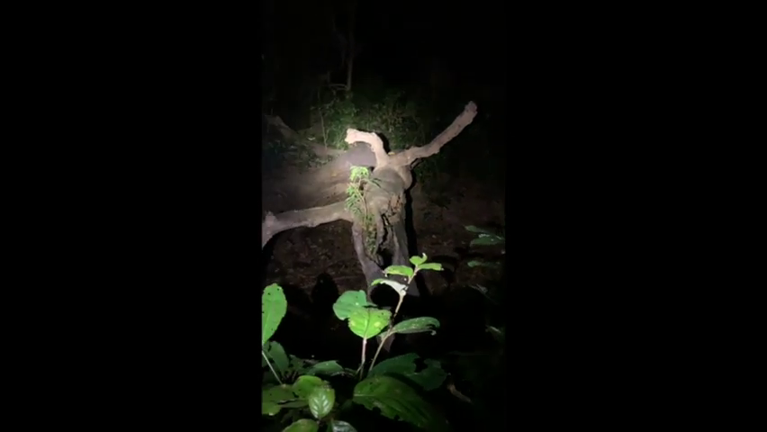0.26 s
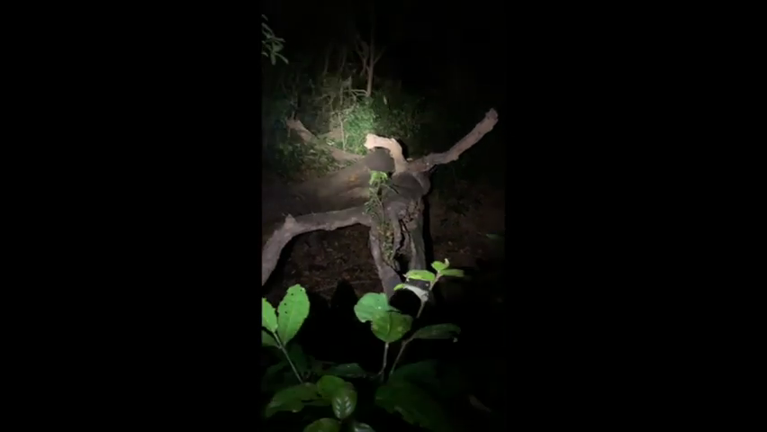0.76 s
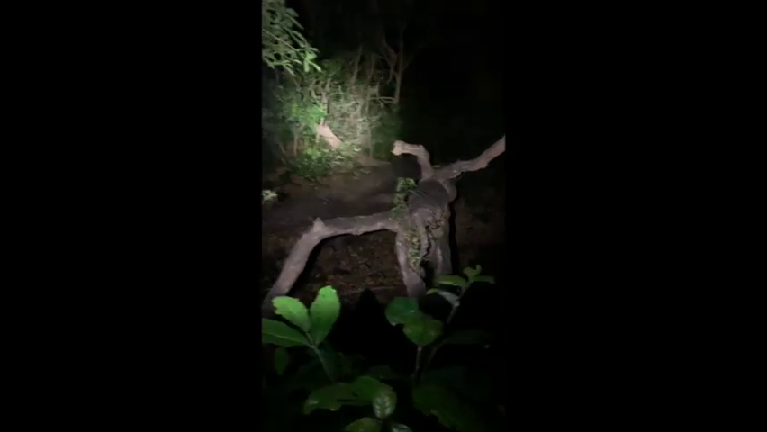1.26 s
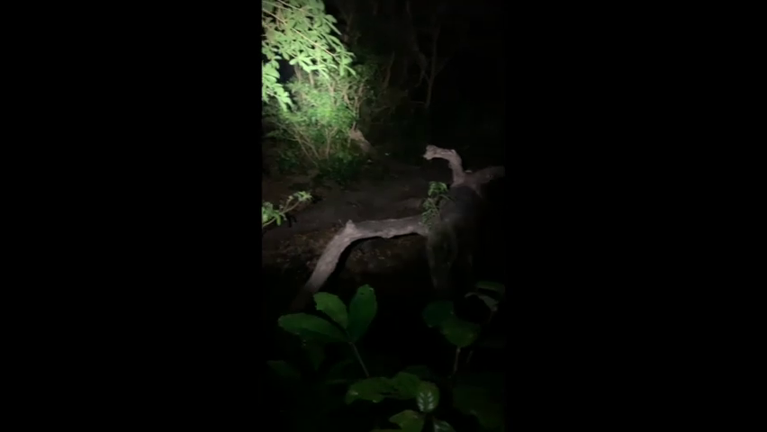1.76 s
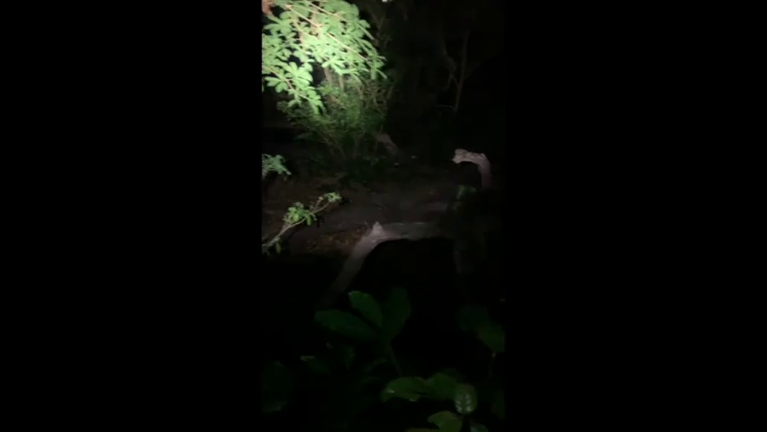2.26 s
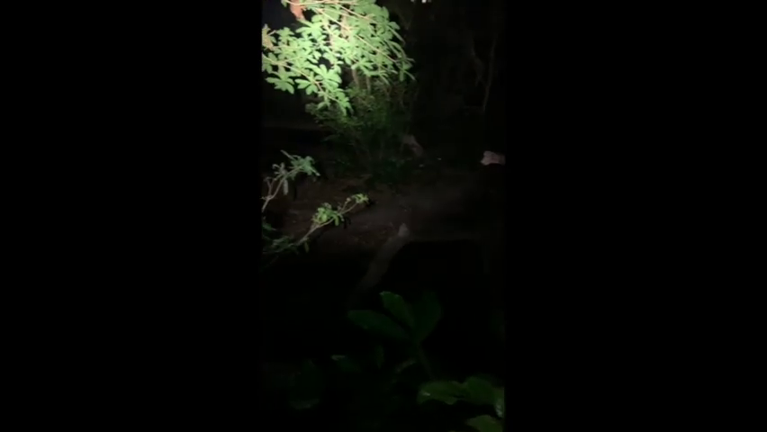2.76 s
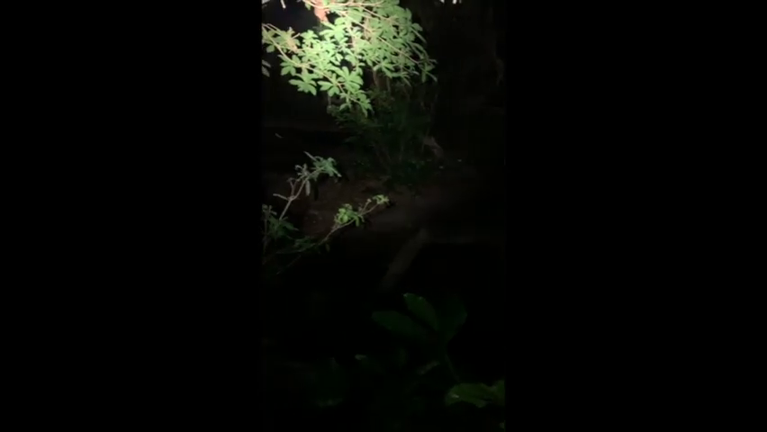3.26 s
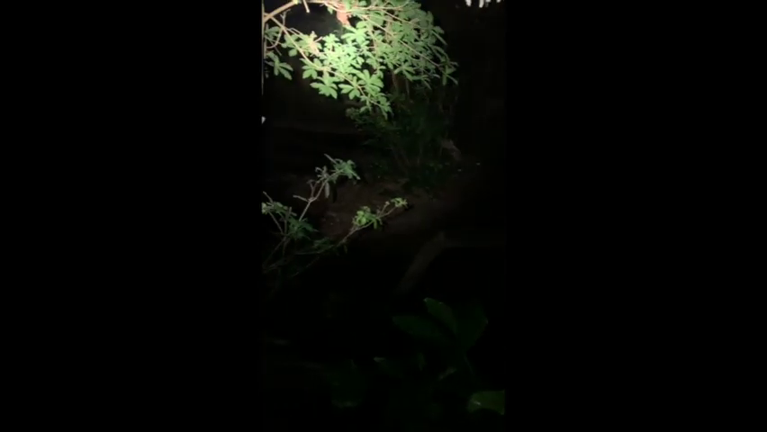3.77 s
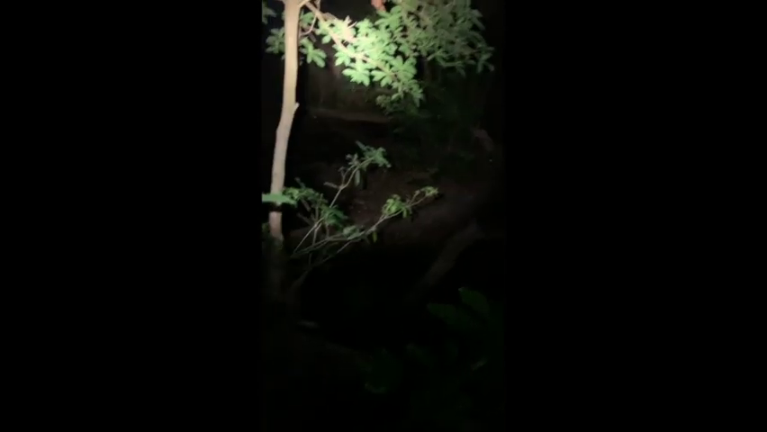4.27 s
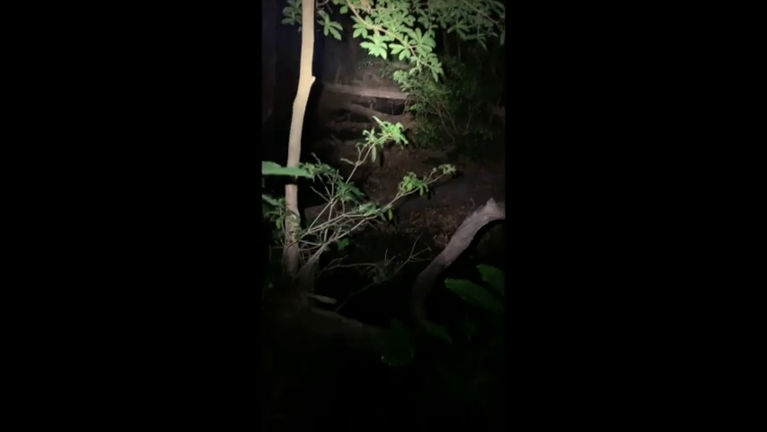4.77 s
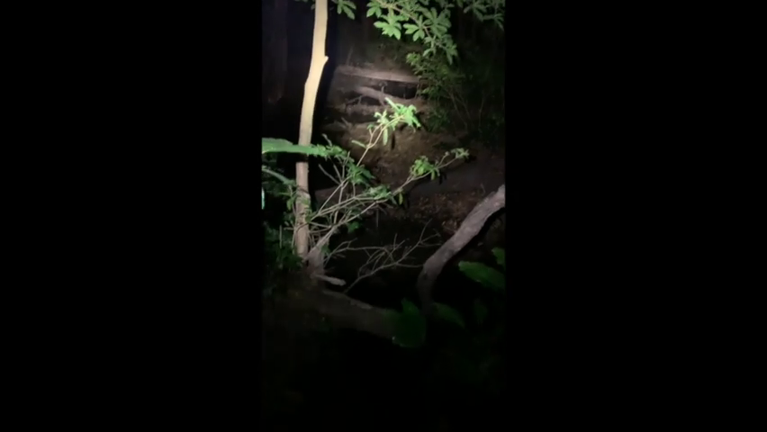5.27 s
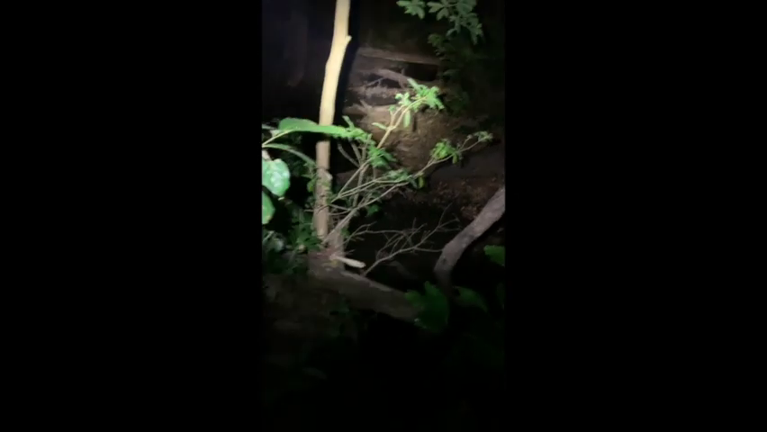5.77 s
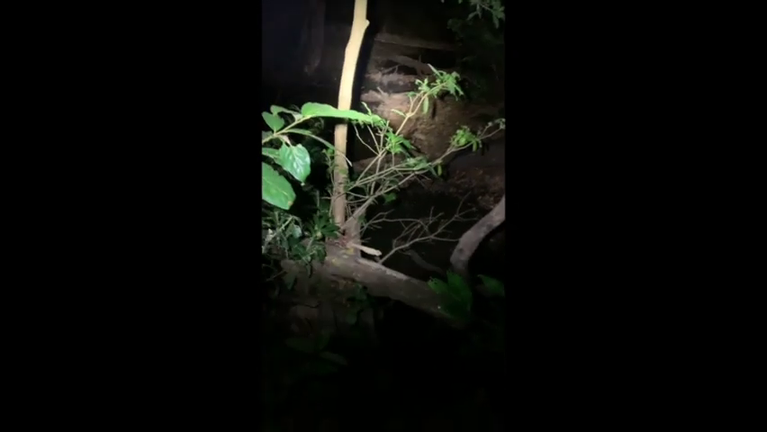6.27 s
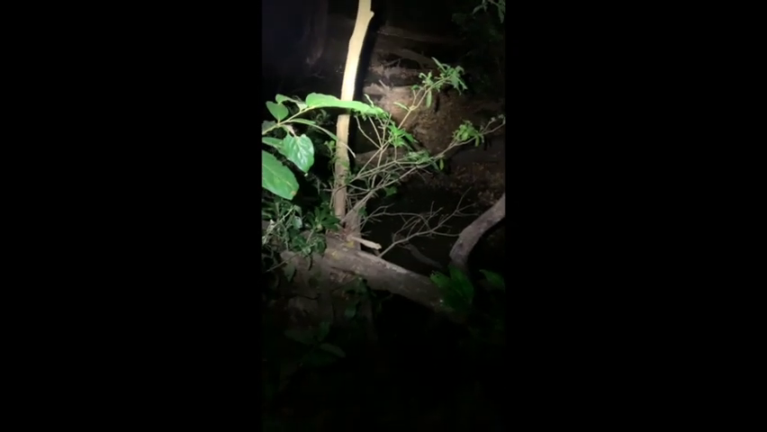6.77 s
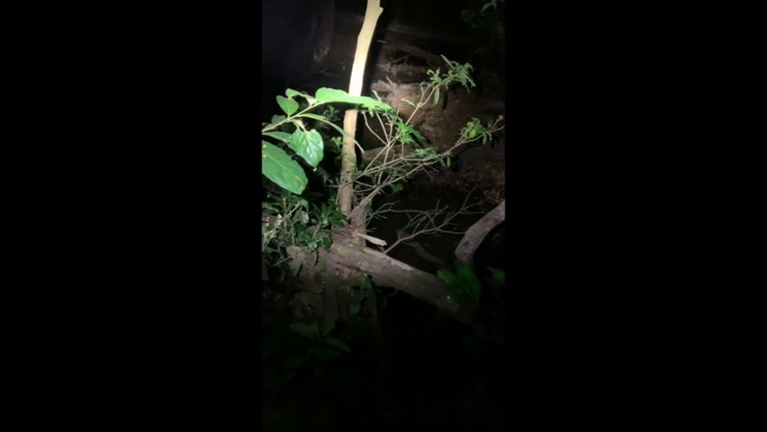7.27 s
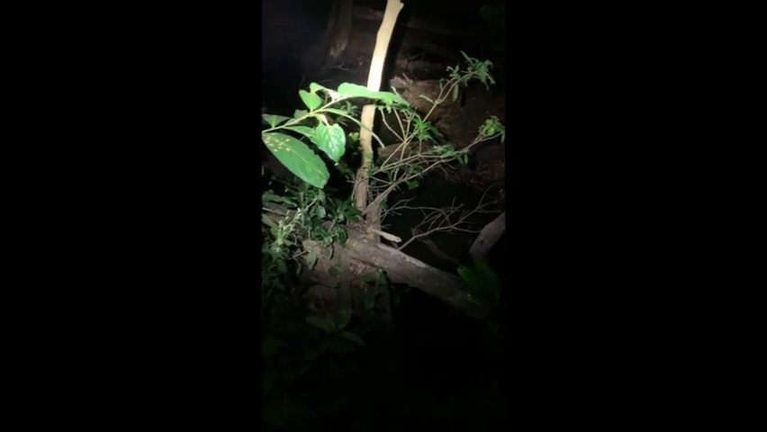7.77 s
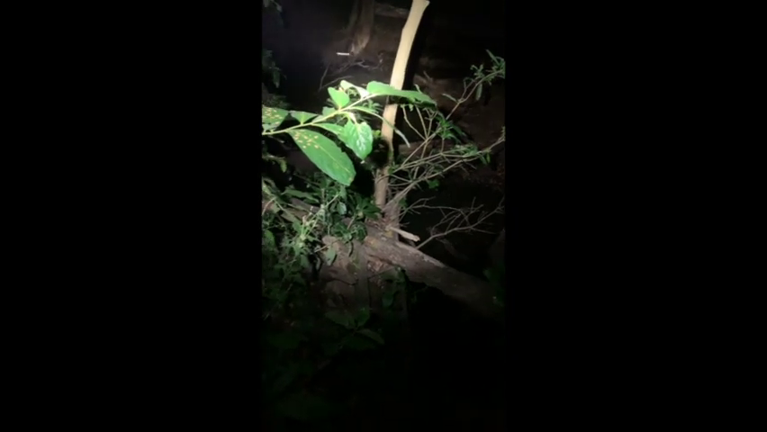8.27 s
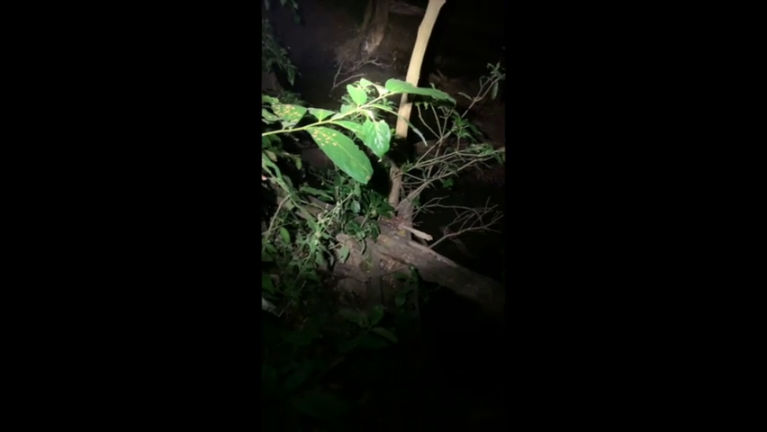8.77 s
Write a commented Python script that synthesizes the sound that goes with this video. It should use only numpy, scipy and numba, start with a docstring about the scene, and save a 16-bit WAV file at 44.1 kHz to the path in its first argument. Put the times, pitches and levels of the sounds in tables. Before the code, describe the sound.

Throughout, a dense, bright drone of crickets and katydids wavers over a soft forest hush: fluttering trills, quick high scratches several times a second and airy hissing surges. From 0.8 to 2.9 s a distant frog gives five notes, a thin opener and then throaty creaking clucks every half second, blurred by the trees. Dry twig ticks fall at about 0.6, 1.5, 2.7, 3.0 and 4.1 s; a very faint frog mutters near 3.4 s. At 4.6 s a near frog opens softly, then calls loudly at 4.85, 5.3, 5.8 and 6.2 s, each a rough knocking creak tightening into a nasal buzz. Soft low finger bumps come between 5.3 and 6.1 s. At 6.6 s a second near frog takes over, with faster notes at 6.9, 7.3, 7.7 and 8.1 s and hollow pops between. A faint mutter and the insects remain until an abrupt stop at 8.9 s.

```python
"""Crickets and katydids drone over a forest hush: wavering tones gated by wing strokes, and banded noise.
Then frogs call in bouts, a far one, two near ones in turn, while a fourth mutters far off.
Most notes start as a slow uneven creak and tighten into a rising buzz: fold pulses and puffs of air ring
throat and sac. Knocks, pops and thuds are short ringing tones. Trees echo the frogs in a noise tail.
Twigs snap as decaying noise, and fingers bump the phone that is held in a hand."""
import sys
import numpy as np
from scipy import signal
from scipy.fft import rfft, irfft
from scipy.io import wavfile
from scipy.ndimage import uniform_filter1d
from numba import njit

SR = 44100
rng = np.random.default_rng(int(sys.argv[2]) if len(sys.argv) > 2 else 0)


def transcribe(u):
    """Save the signal u as a 16-bit wav file named by the first command-line argument.

    u: samples, shape (n,) or (channels, n), limited to [-1, 1]; the rate is SR.
    q: integer samples, one column per channel.
    """
    v = np.clip(np.atleast_2d(u).T, -1, 1)
    q = np.round(v * 32767).astype(np.int16)
    wavfile.write(sys.argv[1], SR, q)


N = 396900
PORT_LAG_MS = 0.12


def undb(db):
    """Decibels to amplitude ratio."""
    return 10 ** (np.asarray(db) / 20)


def unit(x):
    """Scale to an RMS of 1."""
    return x / np.sqrt(np.mean(x ** 2))


def curve(s, values):
    """Straight lines through values at times in seconds."""
    return np.interp(np.arange(N) / SR, s, values)


def walk(rate):
    """Random levels held 1 / rate s and slewed; spread near 1.6."""
    k = int(SR / rate)
    held = np.repeat(rng.standard_normal(N // k + 1), k)
    return 2.0 * uniform_filter1d(held, k)[:N]


def ring(x, hz, width):
    """A resonance passed twice, for steep skirts."""
    b, a = signal.iirpeak(hz, hz / width, fs=SR)
    return signal.lfilter(b, a, signal.lfilter(b, a, x))


def place(x, pan_db, lag_ms):
    """Two microphone ports: pan_db is left minus right, the right one is reached lag_ms later."""
    turn = np.exp(-2j * np.pi * np.fft.rfftfreq(N, 1 / SR) * lag_ms / 1000)
    left = x * undb(pan_db / 2)
    right = irfft(rfft(x) * turn, N) * undb(-pan_db / 2)
    return np.array([left, right])


@njit
def pulse(hz, rough, wait, size):
    """A pulse at each wrap of the phase; roughness scatters the length and size of every cycle."""
    out, phase = np.zeros(len(hz) + 1), np.empty(len(hz))
    p, k, slow = 0., 0, 1.
    for i in range(len(hz)):
        step = hz[i] / slow / SR
        p += step
        if p >= 1:
            p, k = p - 1, k + 1
            g = np.exp(rough[i] * size[k])
            # split over two samples: the wrap falls between them
            out[i] += g * p / step
            out[i + 1] += g * (1 - p / step)
            slow = np.exp(rough[i] ** 1.5 * wait[k])
        phase[i] = p
    return out[:-1], phase


def blips(rows, rise_s, sag):
    """Short tones that swell, sag in pitch to Hz and die: rows (s, peak dB, Hz, seconds to fall 60 dB)."""
    out, t = np.zeros(N), np.arange(SR // 8) / SR
    for s, db, hz, t60 in rows:
        i = int(s * SR)
        swell = np.minimum(t / rise_s, 1) * undb(-60 * np.maximum(t - rise_s, 0) / t60)
        bent_t = t + sag * rise_s * (1 - np.exp(-t / rise_s))
        out[i:i + len(t)] += undb(db) * swell * np.sin(2 * np.pi * hz * bent_t)
    return out


# Forest hush. Each row: frequency in Hz, level in dB per Hz, likeness of the two ports 0-1.
HUSH_SPECTRUM = [(25, -100, .95), (54, -85, 0.98), (133, -89, 0.54), (300, -85, 0), (764, -89, 0),
                 (1380, -86, 0.03), (2420, -91, 1), (3590, -86.5, 0.75), (5340, -78, 0.63),
                 (5680, -92.5, 0.3), (7820, -83, 1), (9200, -102, 0.6), (15100, -100, .95)]


def hush():
    """Octave bands of noise, each flickering on its own, the bass most."""
    out, f = 0, np.fft.rfftfreq(N, 1 / SR)
    hz, db, alike = np.transpose(HUSH_SPECTRUM)
    at = np.log(f + 1)
    alike = np.clip(np.interp(at, np.log(hz), alike), 0, 1)
    tint = undb(np.interp(at, np.log(hz), db)) * np.sqrt(SR / 2)
    common, left, right = rfft(rng.standard_normal((3, N))) * tint
    common = rfft(place(irfft(common, N), 0, PORT_LAG_MS))
    both = np.sqrt(alike) * common + np.sqrt(1 - alike) * np.array([left, right])
    calm_db = curve([6.3, 7., 8.4, 8.8], [4.0, -2.0, -1.0, 0])  # the low rumble eases from 6.3 s
    for k in np.arange(4, 14.5):  # band centre 2 ** k Hz
        share = np.clip(1 - abs(at / np.log(2) - k), 0, 1)
        flicker_db = 3 if k < 8 else 1.7
        level_db = flicker_db * walk(14) + (k < 8) * calm_db
        out = out + undb(level_db) * irfft(both * share, N)
    return out


def phrases(rows, dip_db):
    """A level that swells to each phrase (middle s, length s, dB) over a constant floor."""
    t = np.arange(N) / SR
    coarse = t[::50]
    bumps = sum(undb(db) * np.exp(-(2 * (coarse - s) / length) ** 2) for s, length, db in rows)
    floor_db = np.mean(rows, axis=0)[2] + dip_db
    return np.interp(t, coarse, bumps) + undb(floor_db)


# Short swells of narrow noise. Each row: middle in seconds, length in seconds, level in dB.
NOISE_SWELLS = [(.97, .09, -47), (1.58, .08, -51), (2.72, 0.072, -57), (3.29, .2, -55), (6.18, 0.14, -54),
                (8.55, 0.22, -49.5)]


def noise_swells():
    """Short swells of narrow noise near 9.5 kHz."""
    band = unit(ring(rng.standard_normal(N), 9450, 600))
    return place(phrases(NOISE_SWELLS, -51) * band, 0, PORT_LAG_MS)


def insect(hz, width, stroke_hz, blur, lag_ms, spread, apart_hz):
    """Three near singers take turns, each wing stroke a burst of one wavering tone; far ones blur into noise."""
    tones = 0
    for offset in (-1, 0, 1):
        chance = rng.standard_normal((N // 50, 2)).T
        phase = pulse(stroke_hz * (1 + .01 * walk(2)), np.full(N, .03), *chance)[1]
        tone_hz = hz + apart_hz * offset + .015 * width * walk(4)
        tone = np.sin(2 * np.pi * np.cumsum(tone_hz) / SR)
        tones = tones + undb(15.4 * walk(3.8)) * tone * np.sin(np.pi * phase) ** 2
    scrape = (4.1 + np.exp(-phase / .5)) * rng.standard_normal(N)
    band = lambda x: unit(ring(ring(x, hz, width), hz, 0.79 * width))
    level = np.sqrt(uniform_filter1d(tones ** 2, size=6000))
    near = unit(tones / level + blur * band(scrape))
    return place(near, 0, lag_ms) + spread * band(rng.standard_normal((2, N)))


# Phrases of the low cricket choir. Each row: middle in seconds, length in seconds, level in dB.
LOW_CHOIR_PHRASES = [(.12, 0.29, -46.5), (.62, 0.33, -43.5), (.98, 0.38, -40), (1.53, 0.36, -38),
                     (2.3, 0.26, -41.5), (2.9, 0.69, -43), (3.38, 0.49, -42), (3.8, 0.17, -46),
                     (4.28, 0.42, -39.5), (4.95, 0.36, -49), (5.82, 0.46, -46), (6.5, 0.69, -44),
                     (7.15, 0.33, -44), (7.65, 0.34, -39.5), (8.5, 0.74, -39.5)]


def low_choir():
    """Low crickets: stroke-gated tones and blurred noise swell in phrases."""
    return phrases(LOW_CHOIR_PHRASES, -5.0) * insect(4666, 540, 128, 0.34, 0.083, 0.32, 75)


HIGH_CHOIR_DB, HIGH_WAVER_DB = -42.5, 1.5


def high_choir():
    """Higher crickets: stroke-gated tones and noise whose level drifts at random."""
    level = undb(HIGH_CHOIR_DB + HIGH_WAVER_DB * walk(4))
    return level * insect(5481, 430.5, 65, 0.63, 0.11, 0.35, 90)


# Katydid phrases. Each row: middle in seconds, level in dB.
KATYDID_PHRASES = [(0.022, -50.5), (0.266, -44.5), (0.519, -47.5), (0.843, -45.5), (1.12, -48.5),
                   (1.355, -47), (1.691, -44), (2.008, -43.5), (2.31, -48), (2.591, -47.5), (2.848, -42.5),
                   (3.18, -44), (3.468, -45), (3.712, -44), (4.057, -46.5), (4.284, -47), (4.549, -48),
                   (4.815, -46.5), (5.106, -48.5), (5.367, -46), (5.65, -44), (5.926, -47.5),
                   (6.231, -46.5), (6.495, -50), (6.786, -55), (7.051, -47), (7.304, -46.5), (7.579, -46.5),
                   (7.854, -44.5), (8.177, -44.5), (8.464, -46.5), (8.738, -49)]


def chirping_katydids():
    """Katydids: short phrases, more scraping noise than tone."""
    rows = [(s, 0.1, db) for s, db in KATYDID_PHRASES]
    return phrases(rows, 0.3) * insect(8230, 1100, 125, 2.6, PORT_LAG_MS, 0.062, 240)


# Trills of the nearest crickets. Each row: start in seconds, length in seconds, level in dB, pitch in Hz.
NEAR_TRILLS = [(0.46, 0.2, -41, 4685), (.85, 0.33, -41, 4690), (1.38, 0.35, -43, 4790),
               (2.151, 0.33, -46, 4657), (3.28, .27, -45, 4730), (4.1, 0.43, -48, 4650),
               (5.749, 0.21, -43, 4751), (6.45, .35, -44, 4640), (7.55, 0.36, -48, 4680)]
NEAR_STROKE_HZ, NEAR_FADE_S, NEAR_DEPTH = 125.6, 0.021, 1.1


def near_crickets():
    """A steady tone beaten by the wing strokes, one pitch for each trill."""
    out, t = 0, np.arange(N) / SR
    stroke_hz = NEAR_STROKE_HZ + 2.9 * walk(6.1)
    strokes = 1 + NEAR_DEPTH * np.cos(2 * np.pi * np.cumsum(stroke_hz) / SR)
    waver = np.cumsum(9. * walk(11)) / SR
    for s, length, db, hz in NEAR_TRILLS:
        gate = np.interp(t - s, [0, NEAR_FADE_S, length - NEAR_FADE_S, length], [0, 1, 1, 0])
        out = out + undb(db) * gate * np.sin(2 * np.pi * (hz * t + waver))
    return place(out * strokes * undb(2.7 * walk(31)), 0, 0.089)


# Surges of a broad hissing insect. Each row: middle in seconds, length in seconds, level in dB.
HISS_SURGES = [(.45, 0.43, -46.5), (1.4, 1, -52), (2.75, 0.54, -40), (3.8, 0.49, -47.5), (5., 0.69, -45.5),
               (6.3, 0.6, -43), (7.2, 0.75, -52.5), (8.45, 0.64, -39)]
HISS_HZ, HISS_WIDTH_HZ, HISS_LAG_MS = 12250, 3500, .121


def hiss():
    """Broad resonant noise in surges."""
    band = ring(rng.standard_normal(N), HISS_HZ, HISS_WIDTH_HZ)
    band = unit(ring(band, HISS_HZ, HISS_WIDTH_HZ))
    return place(phrases(HISS_SURGES, -8.5) * undb(1.5 * walk(15)) * band, 0, HISS_LAG_MS)


RASP_RISE_S, RASP_HZ, RASP_CLIMB_HZ_PER_S, RASP_HALF_WIDTH_HZ = 0.022, 13550, 8000, 210


def rasps(peaks, db):
    """Strokes of a high katydid: narrow noise that bites fast, slides upward and dies."""
    t, starts = np.arange(N) / SR, np.append(-1, np.sort(peaks) - RASP_RISE_S)
    u = t - starts[np.searchsorted(starts, t) - 1]  # time since the latest stroke
    u = np.minimum(u, 8 * RASP_RISE_S)
    low_pass = signal.butter(2, RASP_HALF_WIDTH_HZ, fs=SR, output="sos")
    rasp = unit(signal.sosfilt(low_pass, rng.standard_normal(N)))
    swell = u / RASP_RISE_S * np.exp(1 - u / RASP_RISE_S)
    carrier = np.sin(2 * np.pi * np.cumsum(RASP_HZ + RASP_CLIMB_HZ_PER_S * u) / SR)
    return undb(db) * swell * rasp * carrier


# Strokes of the nearest high katydid. Each entry: time of the peak in seconds.
NEAR_RASP_PEAKS_S = [.05, .28, .5, .75, .99, 1.2, 1.31, 1.42, 1.57, 1.68, 1.92, 2.11, 2.34, 2.54, 2.67,
                     2.85, 3.02, 3.17, 3.45, 3.83, 3.89, 4.19, 4.41, 4.64, 4.9, 5.14, 5.35, 5.56, 5.7, 5.95,
                     6.22, 6.44, 6.65, 6.84, 7.01, 7.23, 7.44, 7.85, 8.27, 8.52, 8.68]
NEAR_RASP_DB, FAR_RASP_DB, RASP_BED_DB = -36.5, -43, -45.5
FAR_RASPS_PER_S = 12  # one over the median gap


def high_katydids():
    """One near singer, one farther off at its own uneven pace, and a noise bed of distant ones."""
    far_peaks_s = np.cumsum(np.exp(.4 * rng.standard_normal(size=150))) / FAR_RASPS_PER_S
    bed = unit(ring(ring(rng.standard_normal(N), 13850, 1300), 13800, 1200))
    bed = undb(RASP_BED_DB + 1.2 * walk(6)) * bed
    apart = undb(-61) * unit(ring(rng.standard_normal((2, N)), 13800, 1200))
    near = rasps(NEAR_RASP_PEAKS_S, NEAR_RASP_DB)
    far = rasps(far_peaks_s, FAR_RASP_DB + 3.4 * walk(8))
    return place(near + far + bed, 0, PORT_LAG_MS) + apart


def insects():
    """The insects, each in its own band, and swells of narrow noise."""
    choirs = low_choir() + high_choir() + chirping_katydids()
    return near_crickets() + choirs + hiss() + high_katydids() + noise_swells()


# Twigs snap, leaves rustle. Each row: start in seconds, noise level in dB before the resonance, centre in Hz.
SNAPS = [(0.65, -31.5, 5470), (1.543, -29, 4943), (2.693, -33, 4995), (2.969, -34, 2217),
         (3.021, -31, 1505), (3.047, -34, 1780), (3.305, -36, 880), (4.142, -40, 5000)]


def ticks():
    """Broad dry snaps: decaying noise with random splinters rings a wide resonance."""
    out, t = np.zeros(N), np.arange(SR // 12) / SR
    for s, db, hz in SNAPS:
        i = int(s * SR)
        level_db = db + 2 * rng.exponential(size=len(t)) - 60 * t / .1
        splinters = undb(level_db) * rng.standard_normal(len(t))
        out[i:i + len(t)] += ring(splinters, hz, 2.0 * hz)
    return place(out, 0, PORT_LAG_MS)


# Fingers on the phone. Each row: start in seconds, peak in dB, pitch in Hz.
FINGER_BUMPS = [(3.893, -46, 98), (5.301, -45, 56.36), (5.392, -41, 69.6), (5.508, -39, 107),
                (5.793, -36, 123.5), (6.052, -48, 69.54)]


def bumps():
    """Fingers on the phone: low tones that die in 80 ms, alike at both ports."""
    return blips([(s, db, hz, .08) for s, db, hz in FINGER_BUMPS], 0.0061, 0)


TREES_T60_S = 0.3


def trees(x):
    """Trunks and leaves scatter a call into a short noise tail, unlike at each port."""
    t = np.arange(int(.7 * SR)) / SR
    fade = undb(-60 * t / TREES_T60_S) * np.minimum(t / 0.0062, 1)
    tail = rng.standard_normal((2, len(t))) * fade
    return signal.fftconvolve(x, tail / np.sqrt(np.sum(tail[0] ** 2)), axes=1)[:, :N]


# Frog notes. Each row: start in seconds, length in seconds, level in dB, top resonance extra in dB,
# first pulses in Hz, time to buzz lock in seconds, buzz at lock in Hz, buzz at end in Hz.
NOTES = [(.8, 0.25, -55.5, 5, 430.8, 0.23, 530, 542.5), (1.192, 0.35, -46, -1.5, 151, .19, 435.7, 441.7),
         (1.682, 0.34, -46, 3.5, 118.5, 0.084, 400, 456),
         (2.172, 0.32, -44.5, 4.5, 99.7, 0.11, 383.3, 435.2),
         (2.662, 0.25, -44.5, 3, 119.8, 0.11, 396.8, 441),
         (4.556, 0.155, -39.5, -7.5, 388, 0.14, 515.3, 536),
         (4.85, 0.27, -26.5, -1, 130.9, 0.19, 359.6, 367.5),
         (5.289, 0.29, -30.5, 2.5, 100.1, 0.2, 359.3, 372.4),
         (5.779, 0.285, -31, 3, 109.8, 0.084, 340.5, 404.8),
         (6.236, 0.3, -33, -1, 90.23, 0.093, 300, 422.3), (6.638, 0.15, -40.5, 2, 409.3, 0.12, 524, 542.7),
         (6.935, .245, -29, -1, 124.8, .1, 349.4, 428), (7.329, 0.23, -28, -0.5, 109.4, 0.15, 364.8, 378.5),
         (7.719, 0.25, -28.5, -1, 109.2, 0.13, 341.1, 348.3),
         (8.107, 0.24, -28.5, -6.5, 100.5, .11, 336.3, 354.9), (3.347, 0.27, -53, -32, 300, .1, 300, 300),
         (8.439, 0.33, -52, 2, 300, 0.11, 300, 300)]
# Steps of pitch where the folds dwell on the way to the lock. Each row: time in seconds, pulse rate in Hz.
PITCH_STEPS = [(.88, 481), (.94, 512.6), (4.602, 472), (4.652, 497), (4.9, 187), (4.955, 193.8),
               (4.973, 275.4), (5.015, 277.2), (5.346, 110.4), (5.384, 166.3), (5.405, 271), (5.456, 275.3),
               (5.819, 190.5), (7.389, 136.1), (7.415, 180.7), (7.435, 281), (7.801, 133.1), (7.824, 260.7)]
CLOSE_S, CLOSE_SAG, CLOSE_ROUGH = .035, .3, .55  # sag is a share of the pitch


def note(t, row, count, voice, shape):
    """One note: the folds glide or step to a buzz, and slacken as every note but a bout's first shuts."""
    start, length, db, top_db, first_hz, lock_s, lock_hz, end_hz = row
    clean, tiring, bend, creak = voice
    u = t - start
    rise_hz = first_hz + (lock_hz - first_hz) * np.clip(u / lock_s, 0, 1) ** bend
    steps = [(s - start, f) for s, f in PITCH_STEPS if 0 < s - start < lock_s]
    if steps:
        rise_hz = np.interp(u, *np.transpose([(0, first_hz), *steps, (lock_s, lock_hz)]))
    buzz_hz = np.interp(u, [lock_s, length - CLOSE_S], [lock_hz, end_hz])
    hz = np.where(u < lock_s, rise_hz, buzz_hz)
    shut = (count > 0) * np.clip(1 + (u - length) / CLOSE_S, 0, 1)
    # the slower the folds beat, the rougher; every note of a bout tires them more
    slow_rough = creak * np.clip(1 - hz / lock_hz, 0, 1) ** 2
    rough = clean + tiring * count ** 2 + slow_rough + CLOSE_ROUGH * shut
    share, *levels = np.transpose(shape)
    top, mid, sac = (db + np.interp(u / length, share, c) for c in levels)
    gate = np.interp(u, [-.016, .012, length, length + 0.00097], [0, 1, 1, 0])
    gains = gate * undb(top + top_db), gate * undb(mid), gate * undb(sac)
    return np.array([hz * (1 - CLOSE_SAG * shut), rough, *gains])


def roof(x, hz):
    """Steep low-pass: a body passes little above hz."""
    return signal.sosfilt(signal.cheby2(8, 40, 1.15 * hz, fs=SR, output="sos"), x)


# Throat of each frog. Rows: top, middle and two sac resonances, each centre in Hz and width in Hz;
# the last row: left minus right in dB, lag of the right port in ms.
THROATS = [
    [(2186, 210), (1762, 1030), (726, 210), (1351, 340), (-0.5, 0.16)],
    [(2179, 240), (1775, 1180), (624, 180), (1199, 37), (-1.3, 0.14)],
    [(2328, 540), (1688.5, 630), (678, 166), (1120, 178), (-3.5, 0.1)],
    [(2035, 910), (1390, 620), (665, 160), (970, 760), (0, 0.29)],
]
# Folds of each frog. Each row: roughness of the first buzz 0-1, roughness gained per square of the notes sung,
# bend of the speed-up (1 straight, more = late), roughness added at the slowest creak.
VOICES = [(.045, .008, .6, .9), (.04, .007, 1.1, .55), (.045, .010, 1.6, .5), (.35, 0, 1., 0)]
# Swell of a note, one table per frog. Each row: share of the length, top, middle and sac resonances in dB.
NOTE_SHAPES = [
    [(0, 2, -3, 1.5), (.2, 6, -0.5, -3), (.45, -1, 0.5, -7), (.65, 1, -3, -8.5), (.85, 7, -9, -5),
     (1, -1, 4.5, 3.5)],
    [(0, 3, 4, -7), (.12, 4.5, -3, -15.5), (.35, 0, -5, -12.5), (.5, -0.5, -2.5, -15.5),
     (.67, -9, -1, -11.5), (.83, 3.5, 1, -16), (1, 0, 0, -6.5)],
    [(0, 7, 1.5, -5.5), (.25, 5, -11, -11.5), (.5, -2.5, -7.5, -9.5), (.75, -3, -4.5, -8), (1, 3, 0, -4)],
    [(0, 5.5, -15, -4.5), (1, -1, -5, -10)],
]
# Swell of the note that opens a near frog's bout, then the far frog's. Columns as in NOTE_SHAPES.
OPENER_SHAPE = [(0, -21, 1, -8), (.3, -5, 6, -14), (.6, 1.5, -0.5, -10.5), (1, -11.5, 14, -1)]
FAR_OPENER_SHAPE = [(0, -20, 4, 0), (.3, -6, 6, -6), (.6, 8, 6.4, -17), (1, -1, 11, -4)]
# Body cutoff of each frog. One entry per frog, in Hz.
ROOFS_HZ = [2300, 2440, 2780, 2600]
# Sharp edge of each fold pulse, heard above the roof. One entry per frog: dB relative to the top resonance.
EDGES_DB = [-30, -20, -17, -38]
EDGE_HZ, EDGE_WIDTH_HZ = 2590, 2500
TOP_SAG, SAG_FROM_HZ, SAG_OVER_HZ = 0.06, 145, 181  # top resonance sinks by this share as the folds speed up


def frog(notes, voice, shape, throat, opener, roof_hz, edge_db):
    """Fold pulses and puffs of air ring the throat and the sac."""
    t, controls = np.arange(N) / SR, np.zeros((5, N))
    controls[0] = notes[0][4]
    for k, row in enumerate(notes):
        i, j = int((row[0] - .02) * SR), int((row[0] + row[1] + .02) * SR)
        controls[:, i:j] = note(t[i:j], row, k, voice, opener if k == 0 else shape)
    hz, rough, top_gain, mid_gain, sac_gain = controls
    chance = rng.standard_normal((N // 50, 2)).T
    beats, phase = pulse(hz, rough, .8 * chance[0], 1.2 * np.clip(chance[1], -2, 1.3))
    air = .09 * rough * np.exp(-phase / .3) * rng.standard_normal(N)
    # soft folds and a small body pass little above the throat or below the sac
    body = signal.butter(3, [430, 2550], "band", fs=SR, output="sos")
    # the breath pressure flutters, so even clean partials break up
    breath = undb(1.86 * walk(45)) * signal.sosfilt(body, beats + air)
    top, mid, sac, over = (ring(breath, *mode) for mode in throat[:4])
    top_hz, top_width = throat[0]
    top = ring(top, top_hz, 0.75 * top_width)  # each pulse swells in the top resonance before it dies
    low_hz, sunk = top_hz * (1 - TOP_SAG), np.clip((hz - SAG_FROM_HZ) / SAG_OVER_HZ, 0, 1)
    low_top = ring(ring(breath, low_hz, top_width), low_hz, 2 * top_width)
    top = (1 - sunk) * top + sunk * low_top
    # the lungs set the loudness, however fast the folds beat
    even = lambda x: x / np.sqrt(uniform_filter1d(x ** 2, size=2200) + 1e-12)
    edge = undb(edge_db) * top_gain * even(ring(beats + air, EDGE_HZ, EDGE_WIDTH_HZ))
    call = top_gain * even(top) - mid_gain * even(mid) + sac_gain * even(sac - 0.67 * over)
    return roof(call, roof_hz) + edge


# Single hard knocks of the folds. Each row: start in seconds, throat level in dB,
# sac relative to throat in dB, top resonance relative to throat in dB.
FOLD_KNOCKS = [(.816, -40.5, -1, -20), (1.052, -34, -15, -10), (1.063, -27, -10, -12),
               (1.2002, -32, -10, -17), (1.6911, -25, -9, -7), (2.1695, -24.5, -6, -12),
               (2.6594, -28.5, -15, -11), (4.8092, -24, -7, -14), (4.8267, -16.5, -10.5, -19),
               (4.8459, -13, -6, -13), (4.8544, -22, -3, -4), (5.1113, -17, -6, -4),
               (5.2314, -21.5, -5, -13), (5.248, -15, -14, -16), (5.2706, -13, -12.5, -6),
               (5.2937, -17, -26, -18), (5.6906, -21, -9, -15), (5.7054, -16, -8.5, -8),
               (5.7314, -16.5, -6, -15), (5.7367, -12.5, -9, -0.5), (5.7628, -13.5, -13, -1.5),
               (6.179, -23.5, -4, -22), (6.1941, -17.5, -7.5, -15), (6.224, -16.5, -7.5, -4),
               (6.2472, -18.5, -6.5, -15), (6.8816, -27.5, -6, -7), (6.896, -17, -7, -18),
               (6.9194, -18, -9, 0.5), (6.929, -24, -14.5, -16.5), (6.9386, -23.5, -16.5, -5),
               (7.2706, -27, -8, -24), (7.283, -16.5, -5, -13.5), (7.3098, -14.5, -7, -4),
               (7.316, -16, -12, 0), (7.3202, -15.5, -21, 6), (7.5338, -21.5, -9.5, -5),
               (7.5536, -14.5, -14, -5), (7.6593, -23.5, -7, -14), (7.6708, -16, -4.5, -11),
               (7.7044, -15.5, -0.5, 3.5), (7.7114, -15, -14, 0.5), (7.7328, -20, -14, 2.5),
               (7.7488, -23.5, -2, -11), (7.7687, -26.5, -9, -8), (7.921, -16.5, -14, -16),
               (7.9503, -12.5, -10, -5.5), (8.0744, -19.5, -3.5, -12), (8.106, -17, -7, -13),
               (8.1467, -15.5, -9, -7)]
# Throat under a knock. Each row: pitch in Hz, level in dB, fade by 1/e in seconds.
KNOCK_MODES = [(1330, -4.5, 0.0017), (1705, 1.5, 0.0019), (1873, -2.5, 0.0021)]
KNOCK_SAC_HZ, KNOCK_SAC_S, KNOCK_RISE_S, KNOCK_TOP_S = 654, 0.0062, .0009, 0.006


def knocks(notes, top_hz):
    """The hard pulses of one bout: each rings throat, top resonance and sac as decaying tones."""
    out, t = np.zeros(N), np.arange(900) / SR
    tone = lambda hz, fade_s: np.exp(-t / fade_s) * np.sin(2 * np.pi * hz * t)
    throat = sum(undb(db) * tone(hz, fade_s) for hz, db, fade_s in KNOCK_MODES)
    throat = np.minimum(t / KNOCK_RISE_S, 1) * throat
    top = np.minimum(t / 0.00041, 1) * tone(top_hz, KNOCK_TOP_S)
    sac = np.minimum(t / 0.0045, 1) * tone(KNOCK_SAC_HZ, KNOCK_SAC_S)
    for s, db, sac_db, top_db in FOLD_KNOCKS:
        if notes[0][0] < s < sum(notes[-1][:2]):
            i = int(s * SR)
            out[i:i + len(t)] += undb(db) * (throat + undb(sac_db) * sac + undb(top_db) * top)
    return out


# A sac pops shut or a frog clucks once. Each row: start in seconds, peak in dB, pitch in Hz,
# ring (fall by 60 dB) in seconds.
SAC_POPS = [(1.541, -41, 764, 0.038), (2.016, -55, 684.8, 0.032), (2.888, -34, 1187, 0.026),
            (3.147, -44.5, 667, 0.021), (3.26, -47, 590, 0.068), (3.361, -41, 702, 0.1),
            (3.893, -34.5, 627, 0.033), (4.708, -23.5, 596, 0.015), (5.112, -43, 756, 0.087),
            (5.574, -46, 500.2, 0.028), (6.051, -33, 901.6, 0.095), (6.543, -31, 590, 0.012),
            (6.649, -33.5, 659, 0.089), (6.786, -22, 644, 0.057), (7.179, -24, 1022, 0.061),
            (7.564, -23, 1027, 0.088), (7.955, -25.5, 664.4, 0.019), (8.474, -39, 680.8, 0.054),
            (8.737, -38, 607, 0.043)]
# Notes of each frog. Each row: first index into NOTES, last index + 1.
BOUTS = [(0, 5), (5, 10), (10, 15), (15, 17)]
THUD_HZ, THUD_DB, THUD_RING_S = 400, -6, 0.037  # dB relative to the note


def pops():
    """Sac pops as short tones, and a low falling thud as each bout note shuts."""
    bout_notes = NOTES[:BOUTS[3][0]]
    thuds = [(s + length - .012, db + THUD_DB, THUD_HZ, THUD_RING_S) for s, length, db, *_ in bout_notes]
    return blips(SAC_POPS, 0.0069, 0) + blips(thuds, 0.0072, 0.787)


# Level sent from each frog to the trees. One entry per frog, in dB.
ECHOES_DB = [-2.5, -5.5, -7, 0]
# The hand colours the left port. Each row: centre in Hz, width in Hz, share added (negative takes away).
HAND_SHADE = [(667, 230, -0.37), (1200, 1100, 0.14)]


def scene():
    """Frogs, pops and their echo from the trees, over snaps, bumps, insects and hush."""
    out, wet = 0, 0
    frogs = zip(BOUTS, VOICES, NOTE_SHAPES, THROATS, ROOFS_HZ, EDGES_DB, ECHOES_DB)
    for (a, b), voice, shape, throat, roof_hz, edge_db, echo_db in frogs:
        notes = NOTES[a:b]
        opens = b - a > 2  # the far mutterer neither opens a bout nor knocks
        opener = (OPENER_SHAPE if a else FAR_OPENER_SHAPE) if opens else shape
        hard = opens * knocks(notes, throat[0][0])
        call = frog(notes, voice, shape, throat, opener, roof_hz, edge_db)
        call = call + roof(hard, roof_hz) + 0.12 * ring(hard, EDGE_HZ, EDGE_WIDTH_HZ)
        heard = place(call, *throat[4])
        heard[0] += sum(share * ring(heard[0], hz, width) for hz, width, share in HAND_SHADE)
        out, wet = out + heard, wet + undb(echo_db) * heard
    popping = pops()
    wet = wet + undb(-11.5) * popping
    near = out + place(popping, -5.5, 0.037)
    return near + trees(wet) + ticks() + bumps() + insects() + hush()


STOP_S, TOP_HZ = 8.895, 15200


def record(dry):
    """The phone stops just before the end, a fast fade, and cuts the top with a steep low-pass."""
    stop_db = curve([STOP_S, STOP_S + 0.0018, STOP_S + 0.029, STOP_S + 0.045], [-1.5, -31, -48, -72.5])
    low_pass = signal.ellip(10, .2, 70, TOP_HZ, fs=SR, output="sos")
    return signal.sosfilt(low_pass, dry * undb(stop_db))


dry = scene()
out = record(dry)
transcribe(out)
```